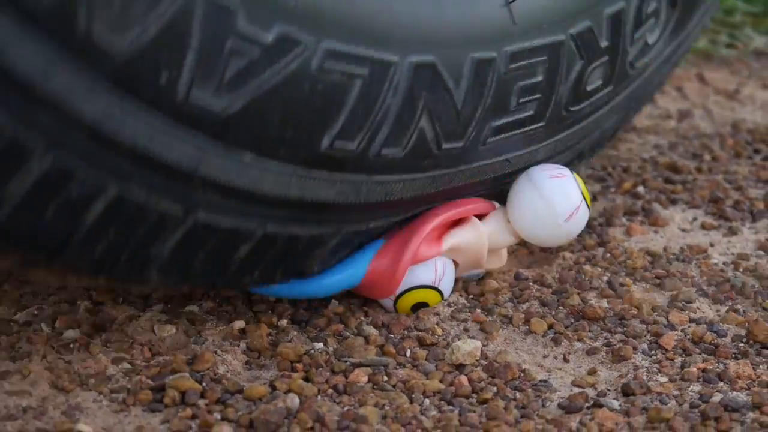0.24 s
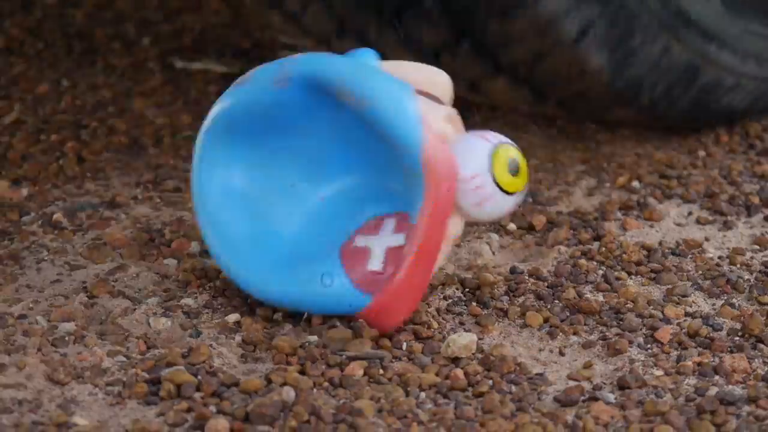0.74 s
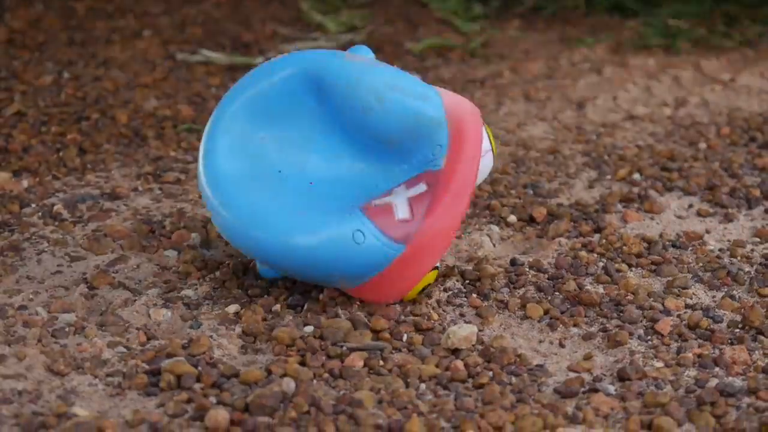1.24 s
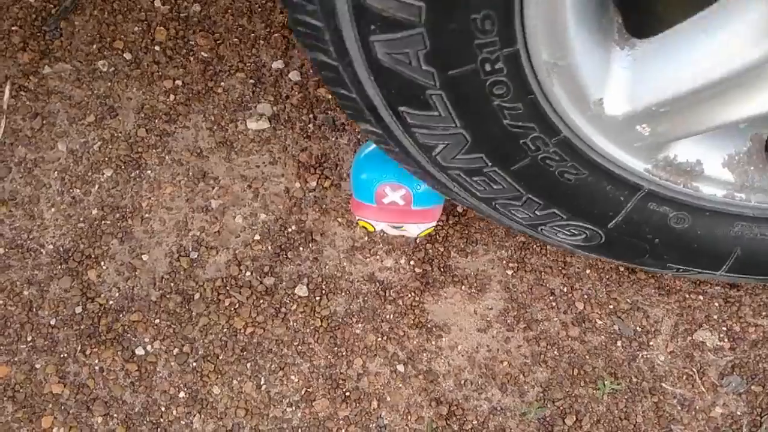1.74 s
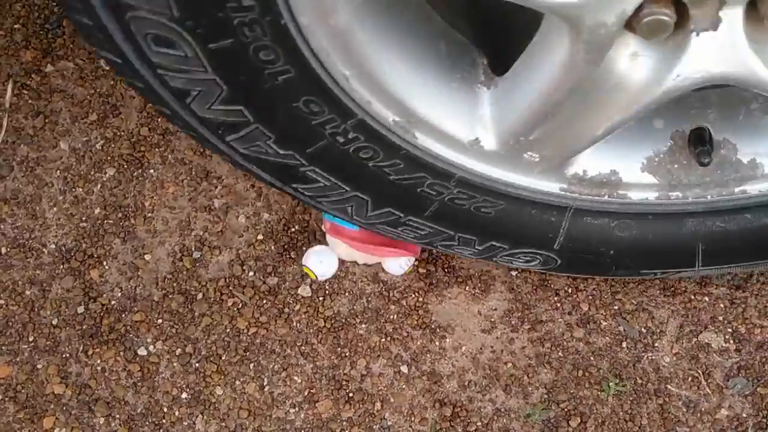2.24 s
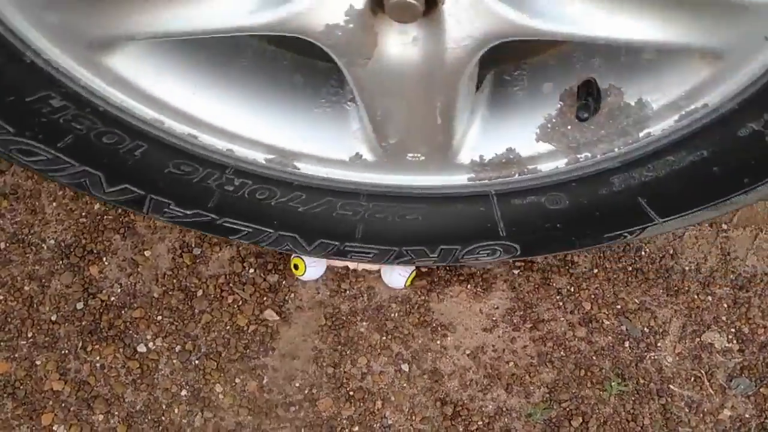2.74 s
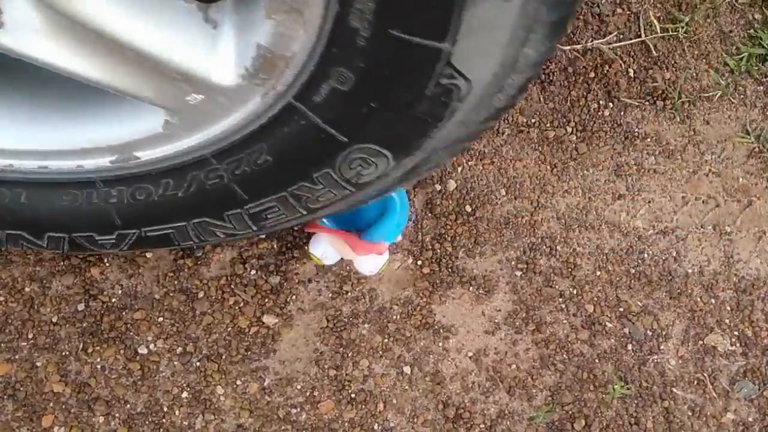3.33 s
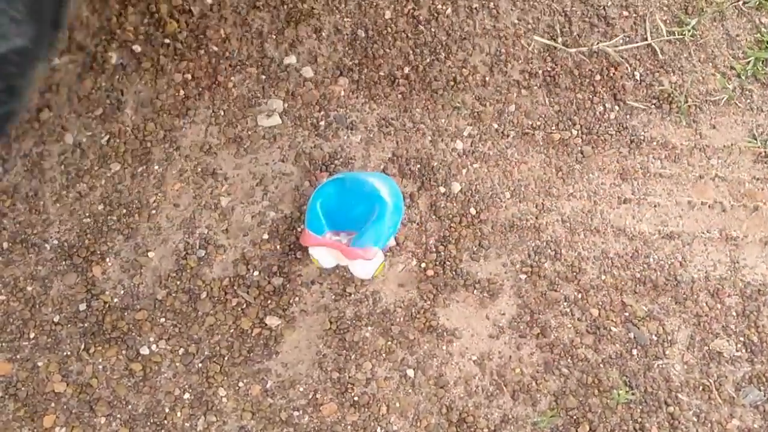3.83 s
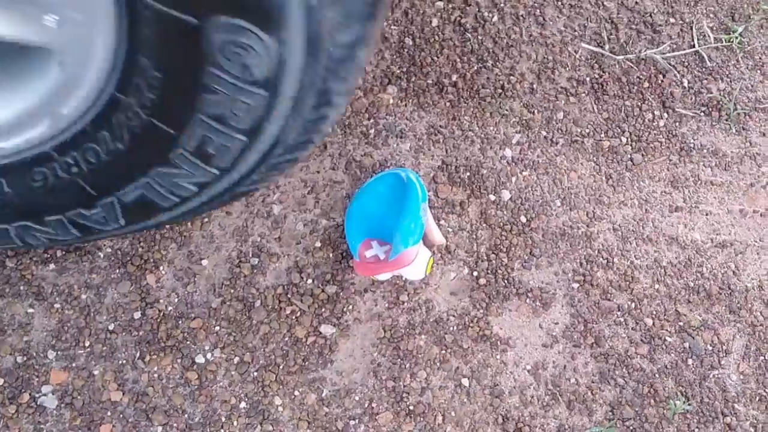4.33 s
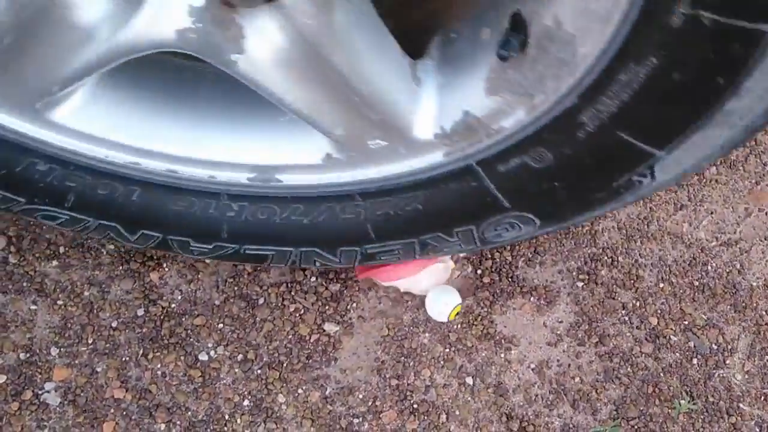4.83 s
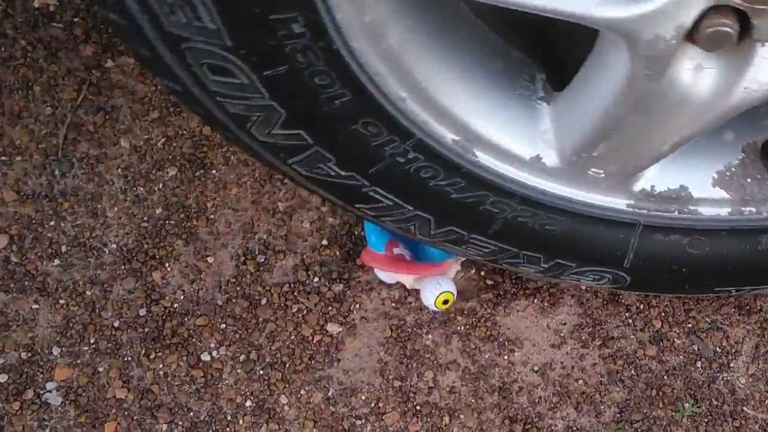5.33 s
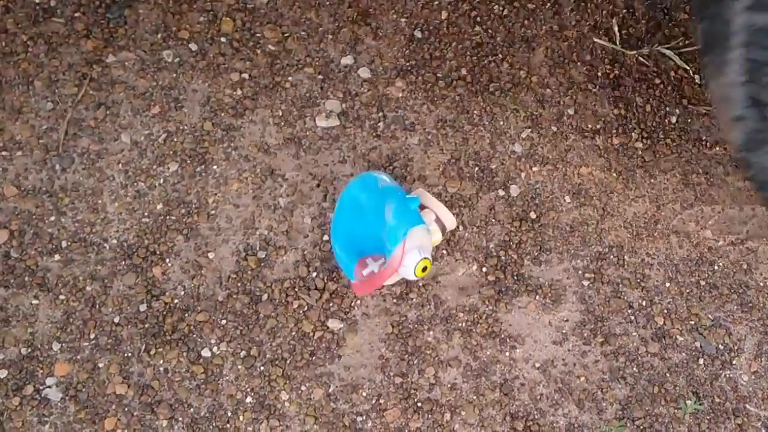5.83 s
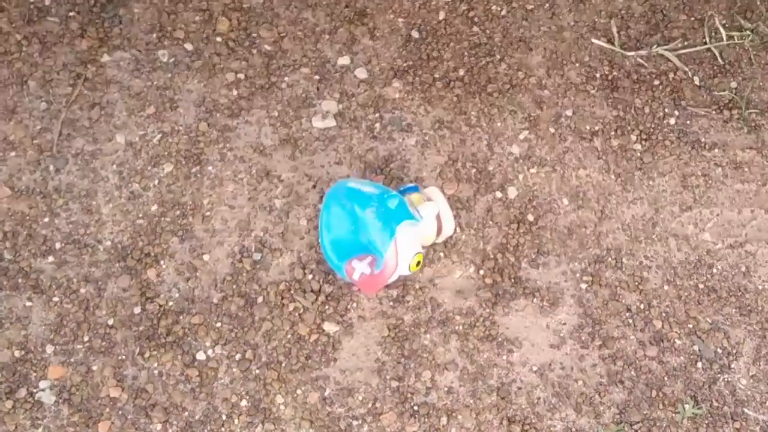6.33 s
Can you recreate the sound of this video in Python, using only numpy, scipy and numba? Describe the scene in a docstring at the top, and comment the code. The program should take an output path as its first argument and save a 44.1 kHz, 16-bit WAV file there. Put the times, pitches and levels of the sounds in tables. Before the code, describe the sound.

Outdoors on gravel, a close microphone at ground level hears a car idling and creeping: deep uneven throb, rumble and hiss. In the first 0.3 s the squeezed toy spits short breathy puffs with clicks and a hollow knock at 0.23; duller knocks follow to 0.8, with a faint squeal near 0.6 and a weak airy whistle at 0.65-0.8. Wind gusts thump softly, strongest around 0.4 and 0.9. At 1.75 the sound jumps to a higher position, with less bass and more whine. Crunches at 2.14 and 2.45 lead to a strong noisy rush of air at 2.6-2.75, then fine bright crackling and ticks until 3.4, with a small whistling puff at 3.3. A quieter idle follows, with sparse ticks. From 4.7 the tyre crunches again; a rising puff at 4.8 precedes a very loud, sharp burst at 5.0. Small knocks and weak puffs fade by 5.6, leaving engine and light crackle until 6.6.

```python
"""On gravel, a car idles and creeps over a hollow rubber toy, heard from ground level, then from above.
Firing pulses excite the exhaust bands over rumble; throbbing noise and narrow whining bands make the engine bay.
Decaying modes and noise snaps crack, and jet noise with a breathy whistle puffs through the small hole of the toy.
Noise in thin bands makes faint squeals, and random clicks in noise a fine treble crackle; at ground level, short
wave packets are gusts thumping the two microphone ports."""
import sys
import numpy as np
from scipy import signal
from scipy.fft import rfft, irfft, next_fast_len
from scipy.io import wavfile
from scipy.ndimage import uniform_filter1d
from numba import njit

SR = 44100
rng = np.random.default_rng(int(sys.argv[2]) if len(sys.argv) > 2 else 0)


def inscribe(sig):
    """Save sig as 16-bit PCM at rate SR to the path in sys.argv[1].

    A 1-D sig is mono; a 2-D sig holds one channel per row.
    Samples are clipped to [-1, 1] before scaling.
    """
    pcm = np.round(np.clip(np.atleast_2d(sig).T, -1, 1) * 32767)
    wavfile.write(sys.argv[1], SR, pcm.astype(np.int16))


N = 290266
TIME = np.arange(N) / SR
CUT_S = 1.745  # the microphone jumps from the low to the high position
LOW = TIME < CUT_S
PUSHED_S = 4.9  # from here the toy lies pushed aside

# Balance of the ports, low then high position: the engine stands left of the low one, and the ports of the
# high one colour unlike. Columns: f/Hz, left minus right level/dB
PORT_BALANCE = [
    [(60, 1), (110, -1), (200, 0.5), (380, -0.5), (700, 1), (1290, 4), (2380, 6), (4400, 4), (8120, 1),
     (15000, -4)],
    [(60, -4), (110, 1.5), (200, -0.5), (380, -1.5), (700, -6), (1290, 3.5), (2380, -1.5), (4400, 0.5),
     (5300, 2.5), (6200, 3.5), (7400, 3), (9200, -10), (11000, -2), (13000, -2), (15000, 1.5)],
]
# Share of a close sound's power common to both ports. Columns: low, high position [0-1]
COMMON_SHARE = (.85, .3)
# Delay of left behind right in the high position. Columns: engine, toy, toy once pushed aside, each t/s
PORT_LAG_S = (.00032, 0, .00021)


def undb(db):
    """Level to amplitude ratio: 20 dB is a factor of ten."""
    return 10 ** (np.asarray(db) / 20)


def unit(x):
    """Normalisation to an RMS amplitude of one."""
    return x / np.sqrt(np.mean(x ** 2))


def colour(x, *tables):
    """Linear filtering in the frequency domain: the responses (f/Hz, level/dB) add in decibels."""
    size = next_fast_len(N)
    log_hz = np.log(np.fft.rfftfreq(size, 1 / SR) + 1)
    db = 0
    for table in tables:
        table_hz, table_db = np.array(table).T
        db = db + np.interp(log_hz, np.log(table_hz), table_db)
    return irfft(rfft(x, size) * undb(db), size)[..., :N]


@njit
def svf(x, g, k):
    """Second-order resonance: a state-variable band-pass, gain 1 at a centre that may move, as may the width."""
    y, b, l = np.empty(len(x)), 0., 0.
    for i in range(len(x)):
        v = (b + g[i] * (x[i] - l)) / (1 + g[i] * (g[i] + k[i]))
        b, l, y[i] = 2 * v - b, l + 2 * g[i] * v, k[i] * v
    return y


def band(x, hz, width):
    """Resonant filtering about a centre frequency, with the bandwidth in Hz."""
    hz = np.clip(hz, 20, .45 * SR)
    tuning = np.tan(np.pi * hz / SR) + np.zeros(len(x))
    damping = np.maximum(width, 5) / hz + np.zeros(len(x))
    return svf(x, tuning, damping)


def edge(x, lo_hz, hi_hz):
    """Zero-phase band limiting between two corner frequencies, to unit RMS."""
    sos = signal.butter(2, [lo_hz, hi_hz], "bandpass", fs=SR, output="sos")
    return unit(signal.sosfiltfilt(sos, x))


def walk(rate):
    """Slow random modulation: levels held 1 / rate s and slewed twice; spread near 1."""
    hold = int(SR / rate)
    steps = np.repeat(rng.standard_normal(N // hold + 1), hold)
    return 1.3 * uniform_filter1d(uniform_filter1d(steps, hold), hold)[:N]


def flicker(depth_db, rate):
    """Independent amplitude modulation: octave bands of noise waver each on its own."""
    noise = rng.standard_normal(N)
    octaves_hz = 17.2 * 2 ** np.arange(9)
    return sum(band(noise, hz, 1.5 * hz) * undb(depth_db * walk(rate)) for hz in octaves_hz)


def ports(mid, side, spectrum, at):
    """Partial coherence: the ports share the mid signal, differ by the side, and left may lag from above."""
    # unlike part of the two ports, low then high position; columns: f/Hz, side minus mid level/dB
    side_level = [
        [(60, -11), (110, -6), (200, -9), (380, -8), (700, -7.5), (1290, -3.5), (2380, -9), (4400, -9),
         (8120, -6.5), (15000, 1)],
        [(60, -78), (200, -42), (380, -41), (700, 1), (1300, -3), (5000, -0.5), (15000, 3.5)],
    ]
    mid = colour(unit(mid), spectrum)
    side = colour(unit(side), spectrum, side_level[at])
    left = np.roll(mid + side, at * int(PORT_LAG_S[0] * SR))
    return np.array([left, mid - side]) / np.sqrt(np.mean(mid ** 2))


def pair(shared, lag_s, count):
    """Partial coherence: two noises with a common part that reaches the left port late."""
    common, own = rng.standard_normal(count), rng.standard_normal((2, count))
    shared = np.clip(shared, 0, 1)
    late = np.roll(common, int(lag_s * SR))
    return np.sqrt(shared) * np.array([late, common]) + np.sqrt(1 - shared) * own


def lean(stereo, table):
    """Interchannel level difference: left is tilted against right, frequency by frequency."""
    halves = [[(hz, sign * db / 2) for hz, db in table] for sign in (1, -1)]
    return np.array([colour(x, half) for x, half in zip(stereo, halves)])


def add(out, s, sound):
    """Superposition of a sound that starts at s seconds."""
    i = int(s * SR)
    out[:, i:i + sound.shape[1]] += sound[:, :N - i]


def engine(at, exhaust_db, bay_db):
    """Periodic excitation: uneven firings thump the exhaust over road rumble and make the bay's hiss throb."""
    # mean firing rate; columns: low, high position f/Hz
    firing_hz = (30.28, 32.5)
    # relative strength of the successive firings; columns: one level/dB per cylinder
    cylinder_db = (0, -8, -1, -8)
    # relative spectra of exhaust and bay, low then high position; columns: f/Hz, level/dB
    exhaust_spectrum = [
        [(18, -49), (30, -15), (101, -1), (162, -2), (247, 1.5), (322, -1), (353, -2.5), (574, -17.5),
         (700, -35), (910, -51), (1540, -120)],
        [(18, -64), (30, -70), (48, -9), (130, 3.5), (166, 1), (225, -24), (244, -1), (335, -6.5), (447, -88),
         (538, -12), (700, -81), (910, -74), (1540, -120)],
    ]
    bay_spectrum = [
        [(200, -23), (400, -7.5), (900, -13), (3000, -19.5), (4300, -21.5), (7000, -25.5), (11400, -30),
         (15000, -55)],
        [(200, 6.5), (350, -3.5), (600, -13), (1600, -10), (3600, -12.5), (4600, -13.5), (8200, -7),
         (10200, -12.5), (11000, -33), (15000, -80)],
    ]
    # belts and alternator sing in narrow bands, low then high position
    # columns: f/Hz, width/Hz, relative level/dB before the bay spectrum
    whine = [
        [(1146, 70, -19), (2860, 240, -9.5), (3760, 80, -5.5)],
        [(526, 51, -8), (1110, 360, -3.5), (1426, 40, -9.5), (2250, 310, -4), (3065, 110, -12), (3930, 77, -4)],
    ]
    # the narrow bands pulse once in two firings, low then high position; columns: rate f/Hz, crest t/s, depth/dB
    pulsing = [(14.6, 1.412, 5.1), (15.8, 4.65, 1.3)]

    chance = rng.standard_normal((300, 2))
    starts = np.cumsum((1 + 0.04285 * chance[:, 0]) / firing_hz[at])
    strength = undb(np.resize(cylinder_db, len(starts)) + 2 * chance[:, 1])
    keep = starts < N / SR
    pulses = np.zeros(N)
    pulses[(starts[keep] * SR).astype(int)] = strength[keep]

    road_db = (4.0, 1.5)[at]  # over the firing thuds
    road = unit(band(flicker(0.47, 23), 112, 257))
    thud = unit(band(pulses, 99, 760)) + undb(road_db) * road
    exhaust = ports(thud, band(flicker(2.2, 15), 162, 600), exhaust_spectrum[at], at)

    throb = 1 + 0.068 * unit(band(pulses, firing_hz[at], 31))
    pulse_hz, crest_s, depth_db = pulsing[at]
    pulsing_db = depth_db * np.cos(2 * np.pi * pulse_hz * (TIME - crest_s))
    hiss = []
    for _ in range(2):  # mid, side
        singing = np.zeros(N)
        for hz, width_hz, db in whine[at]:
            level = undb(db + pulsing_db + 2.7 * walk(60) + 2.66 * walk(5))
            wavering_hz = hz * (1 + 0.0053 * walk(60))
            singing += level * unit(band(rng.standard_normal(N), wavering_hz, width_hz))
        wash = unit(flicker(1.6, 14))
        hiss.append(throb * (wash + undb(-2.5) * singing))
    bay = ports(*hiss, bay_spectrum[at], at)
    return undb(exhaust_db) * exhaust + undb(bay_db + 1.5) * bay


def air():
    """Turbulent jet noise sputters through the hole, with a breathy whistle at a moving pitch and its octave."""
    # relative spectrum of the jet; columns: f/Hz, level/dB
    jet_spectrum = [(1200, -43), (2000, -4), (3200, -22), (4500, -17.5), (5200, -4.5), (6200, 3.5),
                    (8000, 6), (9500, 7.5), (10800, 3.5), (12000, -4), (15600, -4.5)]
    flutter_db, roar_stays = 1.6, .3  # the wall flaps; the roar fades less than the jet
    boom_late_s, boom_fade = 0.021, 1.2  # the hollow boom comes late and fades faster than the jet
    cavity_hz, cavity_width_hz = 4440, 1740  # the squeezed head of the toy rasps
    patch_db, patch_rate = 3.5, 45  # the torn rim of the hole shifts: each jet band spurts on its own

    db, drop, (hz, share, roar_db, top_db, body_db, boom_db, rasp_db) = flow()
    boom_db = boom_db - boom_fade * np.roll(drop, int(boom_late_s * SR))
    db = db + flutter_db * walk(45)
    roar_db = roar_db + roar_stays * drop
    share = np.clip(share, 0, .5)  # the whistle never clears fully
    hz = hz * (1 + 0.015 * walk(60))
    # the clearer the whistle, the narrower its bands
    width = 3400 * np.exp(-3.6 * share)
    flat = np.sqrt(2 * SR / (np.pi * width))  # makes up for the power lost to narrowness
    sputter = undb(1.04 * walk(250) + 0.48 * walk(70))
    patch_hz = 2500 * 2 ** (np.arange(17) / 6)
    spurts = [(centre, undb(patch_db * walk(patch_rate))) for centre in patch_hz]

    before, after = (pair(COMMON_SHARE[1], lag_s, count=N) for lag_s in PORT_LAG_S[1:])
    above = np.where(TIME < PUSHED_S, before, after)
    breath = np.where(LOW, pair(COMMON_SHARE[0], 0, count=N), above)
    out = []
    for noise in unit(breath + np.array([dust(), dust()])):
        low = band(band(noise, hz, width), hz, width) * flat
        octave = band(band(noise, 2 * hz, width), 2 * hz, width) * flat
        whistle = undb(body_db) * low + octave
        turbulence = unit(colour(patchy(noise, spurts), jet_spectrum))
        jet = np.sqrt(1 - share) * turbulence + np.sqrt(share) * whistle
        rasp = unit(band(band(noise, cavity_hz, cavity_width_hz), cavity_hz, cavity_width_hz))
        roar = undb(roar_db) * edge(noise, 570, 5200)
        top = undb(top_db) * edge(noise, 11700, 18600)
        boom = undb(boom_db) * edge(noise, 170, 1400)
        out.append(jet + undb(rasp_db) * rasp + roar + top + boom)
    return undb(db + 3) * sputter * off_tread(np.array(out), .0014, .45)


def flow():
    """Energy summation of the puffs: total level, mean drop below the peaks, power-weighted mean settings."""
    # puffs through the hole; columns: full from t/s, rise t/s, hold t/s, fall t/s, relative peak level/dB,
    # whistle f/Hz when full, glide [octaves per s], whistle share [0-1], then relative levels/dB:
    # roar, top, whistle over its octave, hollow boom, rasp of the cavity
    puffs = [(0.028, 0.046, 0.02, 0.045, -42.5, 4200, 6, 0.11, 7, -28, 23, -30, 4),
             (0.066, 0.034, 0.016, 0.054, -30.5, 4950, 2, 0.12, -1.5, -22, 3.5, -34, -5),
             (0.234, 0.0033, 0.015, 0.046, -26.5, 4600, 7, 0.06, -9, -5, 2, -30, -9),
             (0.648, 0.096, 0.079, 0.087, -42.5, 4820, 0.5, 0.38, -4.5, -33, -8, -3, -11),
             (0.771, 0.1, .06, 0.093, -44.5, 4330, 0.5, 0.13, -9, -28, -5, -20, -14),
             (2.62, 0.034, 0.036, 0.16, -12, 3860, 2, 0.02, -19, -1, 0, -21, -19),
             (2.7, 0.097, 0.018, 0.09, -20.5, 4500, -2, 0.04, -33, -1, 4, -28, -15),
             (2.8, .1, .04, 0.61, -44.5, 4700, 3, 0, -20, -8, -7, -30, -16),
             (3.285, 0.016, 0.03, 0.027, -37, 4670, 11.5, 0.38, -13, -9, 0, -24.5, -15),
             (4.799, 0.071, 0.017, .06, -35.5, 3180, 13, 0.28, -10, -33, -3, -32, -2),
             (4.834, 0.043, 0.029, 0.048, -28.5, 3600, 3, 0.14, -14, -30, -14, -40, -7.5),
             (5.004, 0.0076, 0.0041, 0.041, -10, 5660, -2, 0.01, -24, -11, -2, -36, -18),
             (5.395, 0.079, 0.065, 0.092, -37.5, 5300, 1.5, 0.19, -22, -35, 2, -30, -19),
             (5.503, 0.08, 0.044, 0.11, -37, 4500, -4, 0.02, -21, -35, -11, -27, -15)]
    range_db = 30  # a puff rises through and falls by this much in its rise and fall times
    rise_bend, fall_bend = 1.7, 1  # over 1: rounded at the top

    s, rise, hold, fall, peak_db, hz, glide, *rest = np.array(puffs).T[:, :, None]
    early = np.maximum(s - TIME, 0) / np.abs(rise)
    late = np.maximum(TIME - s - hold, 0) / np.abs(fall)
    drop = range_db * (early ** rise_bend + late ** fall_bend)
    power = undb(2 * np.maximum(peak_db - drop, -150))
    total = power.sum(0)

    def mean(column):
        """Power-weighted average: the louder puff leads."""
        return (power * column).sum(0) / total

    hz = hz * 2 ** np.clip(glide * (TIME - s), -.5, .5)
    return 10 * np.log10(total), mean(np.minimum(drop, range_db)), [mean(c) for c in (hz, *rest)]


def patchy(noise, spurts):
    """Independent amplitude modulation: narrow bands of the treble spurt each at its own level."""
    return sum(band(noise, hz, .11 * hz) * gain for hz, gain in spurts)


def dust():
    """Impulsive noise: grains of dust torn through the hole tick sparsely with very uneven size."""
    per_s, spread_db, level_db = 2000, 4, -7
    size = undb(spread_db * np.minimum(rng.exponential(size=N), 4))
    size *= np.sign(rng.standard_normal(N))
    return undb(level_db) * unit((rng.random(N) < per_s / SR) * size)


def off_tread(stereo, lag_s, gain):
    """Comb interference: an echo off the moving tread cuts shifting streaks into the spectrum."""
    lag = (lag_s * SR * undb(2.1 * walk(9))).astype(int)
    echo = stereo[:, np.maximum(np.arange(N) - lag, 0)]
    return (stereo + gain * echo) / np.sqrt(1 + gain ** 2)


def cracks():
    """Modal decay: a knock rings the shell modes near its centre; a snap of bright noise dies on top."""
    # stones and toy cracking; columns: t/s, relative knock level/dB, knock centre f/Hz, knock t60/s,
    # relative snap level/dB, snap centre f/Hz
    events = [(0.037, -30, 2500, .02, -22, 5000), (0.067, -24, 1300, .03, -40, 4500),
              (0.155, -20, 1020, 0.039, -56, 4240), (0.234, -10.5, 1220, 0.096, -28, 4800),
              (0.406, -31, 1400, .025, -55, 4200), (0.461, -30, 1600, 0.037, -58, 4500),
              (0.525, -26, 880, 0.16, -60, 5670), (0.566, -30, 1700, .04, -58, 4500),
              (0.6, -24.5, 610, 0.17, -56, 4460), (0.627, -26, 700, .04, -58, 4500),
              (0.78, -32, 840, .04, -58, 4500), (0.8, -27, 1200, 0.088, -51, 4200),
              (2.137, -21, 454, 0.05, -13, 7700), (2.213, -45, 401, .05, -36, 5300),
              (2.351, -36, 452, 0.058, -19, 14300), (2.368, -29, 900, 0.15, -43, 14000),
              (2.448, -10.5, 414, 0.074, -17, 8600), (2.528, -37, 463, 0.065, -36, 9120),
              (2.64, -23, 278, 0.12, -40, 8000), (2.653, -21.5, 596, .08, -40, 8000),
              (2.829, -34, 2190, 0.065, -26, 8520), (2.844, -48, 2200, 0.028, -27, 9020),
              (2.861, -45, 2610, 0.048, -34, 8750), (2.883, -47, 401, .05, -40, 7280),
              (2.897, -49, 474, .05, -29, 8210), (2.924, -29, 1800, 0.042, -50, 7950),
              (2.958, -48, 2200, .04, -36, 9000), (2.984, -48, 2200, .04, -31, 9000),
              (2.994, -48, 2200, .04, -37, 8000), (3.012, -48, 2200, .04, -32, 9000),
              (3.023, -41, 2240, 0.059, -28, 9100), (3.086, -42, 877, 0.06, -38, 6510),
              (3.073, -48, 1400, .04, -38, 9000), (3.112, -48, 1400, .04, -33, 8500),
              (3.124, -39, 1380, .05, -36, 7290), (3.224, -29.5, 476, 0.04, -23, 6400),
              (3.258, -31, 1300, .04, -50, 6000), (3.271, -22.5, 500, 0.046, -41, 9200),
              (3.371, -51, 1480, 0.021, -25, 7000), (3.398, -54, 439, .055, -36, 7060),
              (3.422, -39, 956, 0.053, -41, 6000), (3.649, -33.5, 2300, 0.023, -53, 5500),
              (3.96, -37, 1120, 0.025, -52, 4000), (4.028, -41, 1500, .04, -49, 8200),
              (4.199, -52, 1500, 0.045, -38, 7400), (4.25, -34, 2500, 0.05, -48, 5000),
              (4.268, -29, 2100, 0.032, -42, 4000), (4.745, -27, 504, 0.047, -32, 7310),
              (4.76, -31, 450, .04, -50, 7000), (4.807, -43, 900, .04, -27, 6500),
              (4.923, -24, 920, 0.023, -43, 8030), (4.954, -33.5, 557, 0.044, -48, 8750),
              (4.999, -14, 1990, 0.089, 14, 9900), (5.183, -37.5, 665, 0.068, -31, 6440),
              (5.238, -39, 980, .045, -42, 7720), (5.28, -32, 1490, 0.18, -45, 7300),
              (5.355, -30.5, 466, 0.11, -35, 5540), (5.374, -37, 600, .04, -50, 6000),
              (5.388, -31, 406, 0.052, -48, 9590), (5.445, -32.5, 700, 0.068, -43, 5360),
              (5.466, -40, 420, 0.054, -28, 9000), (5.546, -30, 700, 0.074, -33, 8780),
              (5.606, -28.5, 420, 0.052, -49, 7250)]
    # modes of toy and tread; columns: f/Hz, relative level/dB before scaling
    modes = [(275, 8.5), (595, -5.5), (968, 0), (1366, 8), (2186, 10), (2602, 8.5)]
    snap_share = 0.45  # the snap dies in this share of the knock's time
    echo_s, echo_db = (0.0019, .0047), -13.5  # off sill and ground, left and right

    out, t = np.zeros((2, N)), np.arange(SR // 8) / SR
    fall = np.log(1000) * t
    for s, knock_db, knock_hz, knock_s, snap_db, snap_hz in events:
        at = int(s > CUT_S)
        ring = np.zeros(len(t))
        for hz, db in modes:
            level_db = 0.74 * db - 2.8 * np.log2(hz / knock_hz / 1.1) ** 2
            mode_hz = hz * (1 + 0.0464 * rng.standard_normal())
            ring += undb(level_db) * np.sin(2 * np.pi * mode_hz * t)
        rattle = band(rng.standard_normal(len(t)), knock_hz, 1.3 * knock_hz)
        contact = np.sin(2 * np.pi * knock_hz * t) * np.exp(-0.8 * knock_hz * t)
        attack = 1 - np.exp(-t / 0.00061)
        decay = np.exp(-fall / max(knock_s, .01))
        knock = (unit(ring) + 1.3 * unit(rattle)) * decay * attack + 4.84 * contact
        knock /= np.abs(knock).max()

        lag_s = at * PORT_LAG_S[1 + int(s > PUSHED_S)]
        noises = pair(COMMON_SHARE[at], lag_s, count=len(t))
        snap = unit(np.array([band(noise, snap_hz, 0.71 * snap_hz) for noise in noises]))
        # a bigger rupture takes longer to open
        opening = 1 - np.exp(-t / (0.011 * undb(snap_db)))
        snap_decay = np.exp(-fall / max(snap_share * knock_s, .005))
        add(out, s, undb(knock_db + 2.5) * knock + undb(snap_db + 0.5) * snap * opening * snap_decay)
    direct = out.sum(0) / 2
    # the car body and the ground throw each crack back a moment later
    echo = np.array([np.roll(direct, int(delay * SR)) for delay in echo_s])
    return out + undb(echo_db) * echo


def brake():
    """Narrow-band friction noise: faint thin squeals while pads and rubber drag."""
    # squeals of brake and rubber; columns: t/s, length t/s, f/Hz, level/dB
    squeals = [(0.558, 0.2, 1393, -44.5), (0.953, .15, 5650, -56), (1.757, 0.24, 5970, -59),
               (2.985, 0.15, 3405, -51), (3.502, 0.19, 5920, -57.5)]
    edge_s, width_hz = 0.024, 20
    out = np.zeros((1, N))
    for s, length, hz, db in squeals:
        t = np.arange(int(length * SR)) / SR
        on = np.clip(np.minimum(t, length - t) / edge_s, 0, 1)
        tone = unit(band(band(rng.standard_normal(SR), hz, width_hz), hz, 2 * width_hz))
        add(out, s, undb(db) * on * tone[None, :len(t)])
    return out


def treble_crackle(db):
    """Random impulsive noise: dense clicks of very uneven size merge with noise into a fine treble crackle."""
    # relative spectrum of the crackle; columns: f/Hz, level/dB
    crackle_spectrum = [(2940, -39), (5000, -35), (5770, -7), (8710, -0.5), (11000, -5.5), (15200, -12),
                        (15700, -5)]
    hits = rng.random((2, N)) < 2500 / SR  # 2500 clicks per s
    size = undb(6.1 * np.minimum(rng.exponential(size=(2, N)), 4))
    clicks = hits * size * np.sign(rng.standard_normal((2, N)))
    crackle = unit(clicks) + rng.standard_normal((2, N))
    return undb(db + 2.0 * walk(20.0)) * unit(colour(crackle, crackle_spectrum))


def thumps():
    """Wind pressure on the diaphragms: each gust is a short wave packet of a cycle or two."""
    # the strong thumps; columns: centre t/s, nominal level/dB, f/Hz
    strong = [(0.101, -29, 169), (0.24, -32, 170), (0.39, -15, 149), (0.417, -21, 170), (0.475, -23, 140),
              (0.645, -17, 170), (0.712, -20, 200), (0.749, -22, 190), (0.774, -23, 140),
              (0.872, -17.5, 150), (0.899, -18, 190), (0.917, -12, 140), (0.944, -23, 140),
              (0.985, -18, 190), (1.014, -14, 173), (1.293, -23, 170), (1.363, -17.5, 168),
              (1.421, -25, 170), (1.46, -16.5, 170), (1.498, -20, 170), (1.702, -22.5, 172),
              (1.736, -20, 171)]
    # smaller ones are scattered at random while the microphone lies low
    small_count, small_db, small_hz = 16, -24, 170
    small = []
    for a, b, c in rng.random((small_count, 3)):
        small.append((CUT_S * a, small_db + 6 * (b - .5), small_hz * (1 + 0.3 * (2 * c - 1))))
    out = np.zeros((2, N))
    for s, db, hz in strong + small:
        cycles = np.arange(int(3 * SR / hz)) / SR * hz - 1.5
        swing = np.cos(2 * np.pi * (cycles + rng.random()))
        push = undb(db) * swing * np.exp(-(cycles / 0.5) ** 2)
        port_gain = undb(2.0 * rng.standard_normal((2, 1)))
        add(out, max(s - 1.51 / hz, 0), push * port_gain)
    return out


def scene():
    """Superposition of all sources; bay hiss, rumble and treble crackle follow level tables over time."""
    # low then high position; columns: t/s, relative engine-bay hiss level/dB, fine treble crackle level/dB
    hiss_and_crackle = [
        [(0.0, -38.5, -47), (0.27, -39.5, -56), (0.84, -40, -64), (1.74, -38.5, -51)],
        [(1.76, -42.5, -64), (2.1, -41.5, -59), (2.32, -40.5, -47), (2.63, -40, -51), (2.74, -39.5, -35.5),
         (3.22, -41, -48), (3.42, -42.5, -52), (3.56, -44.5, -100), (4.57, -44.5, -84), (4.67, -42, -51.5),
         (4.9, -39, -43), (5.14, -40, -51), (5.91, -40.5, -53), (6.58, -39, -44.5)],
    ]
    # level of the low rumble, low then high position; columns: t/s, exhaust and road rumble level/dB
    rumble_levels = [
        [(0.0, -33.5), (0.328, -34.5), (0.856, -33.5), (1.046, -33), (1.284, -36), (1.458, -31.5),
         (1.584, -33.5), (1.74, -34.5)],
        [(1.76, -39), (1.95, -43), (2.04, -44), (2.31, -40.5), (2.56, -40.5), (2.69, -42), (4.55, -41.5),
         (4.69, -40.5), (5.97, -44.5), (6.58, -42)],
    ]
    level_s, hiss_levels, crackle_levels = np.vstack(hiss_and_crackle).T
    bay_db = np.interp(TIME, level_s, hiss_levels)
    crackle_db = np.interp(TIME, level_s, crackle_levels)
    rumble_db = np.interp(TIME, *np.vstack(rumble_levels).T)
    below = lean(engine(0, rumble_db, bay_db), PORT_BALANCE[0])
    car = np.where(LOW, below, engine(1, rumble_db, bay_db))
    return car + treble_crackle(crackle_db) + thumps() + cracks() + air() + brake()


def record(dry):
    """Band limiting and overload: the low position is dulled, the high one gets its port colour, peaks clip."""
    low_top_hz, bottom_hz, top_hz = 14300, 50, 15650  # top of the low position; bottom and top of both
    dull = signal.sosfilt(signal.ellip(6, .2, 40, low_top_hz, fs=SR, output="sos"), dry)
    heard = np.clip(np.where(LOW, dull, lean(dry, PORT_BALANCE[1])), -1, 1)
    heard = signal.sosfilt(signal.butter(4, bottom_hz, "highpass", fs=SR, output="sos"), heard)
    return signal.sosfilt(signal.ellip(14, .2, 80, top_hz, fs=SR, output="sos"), heard)


dry = scene()
out = record(dry)
inscribe(out)
```